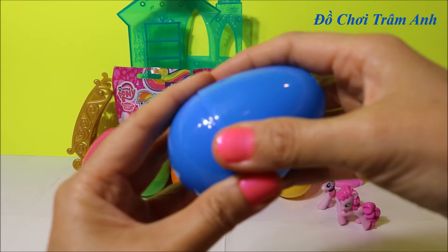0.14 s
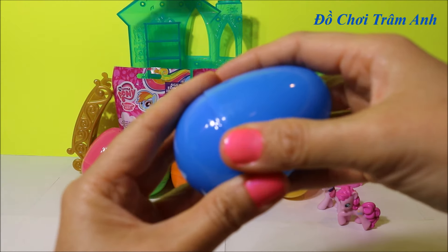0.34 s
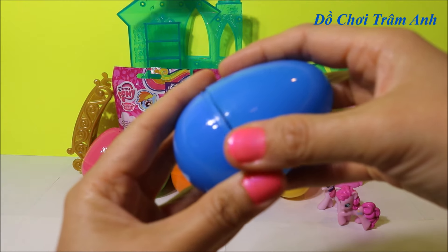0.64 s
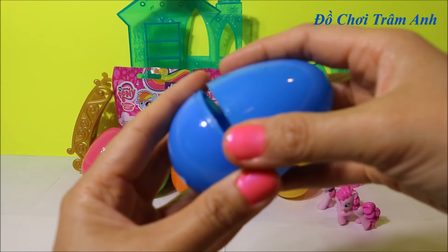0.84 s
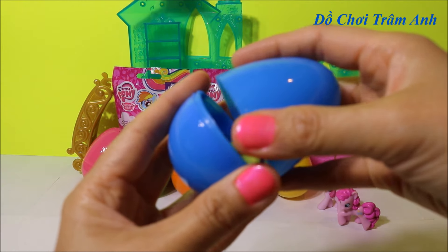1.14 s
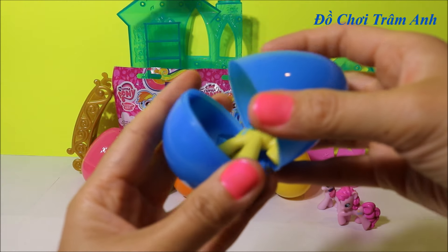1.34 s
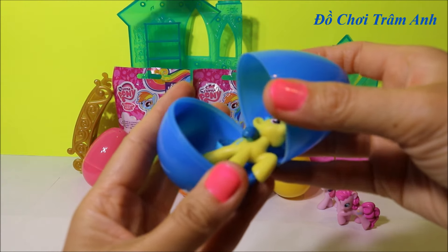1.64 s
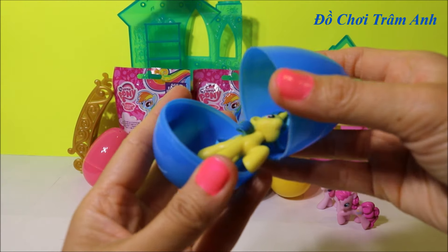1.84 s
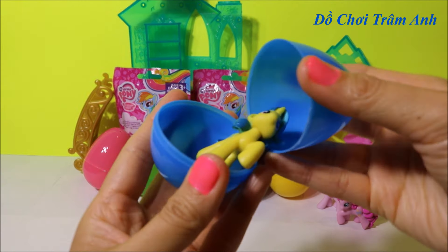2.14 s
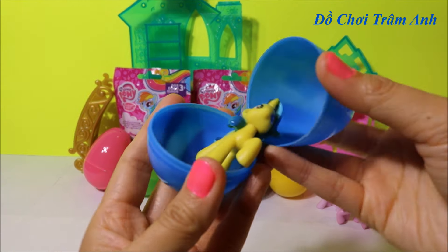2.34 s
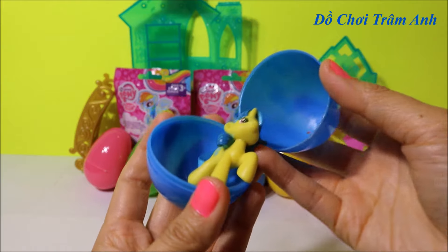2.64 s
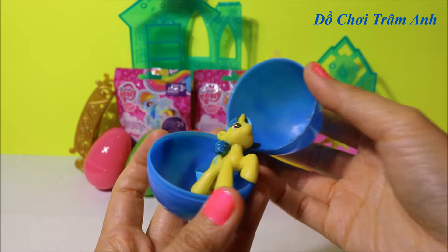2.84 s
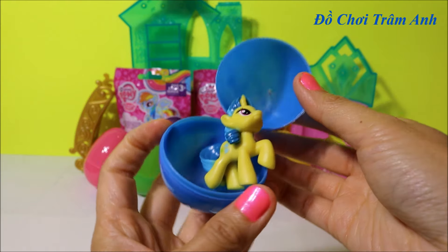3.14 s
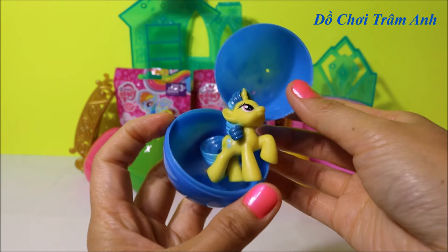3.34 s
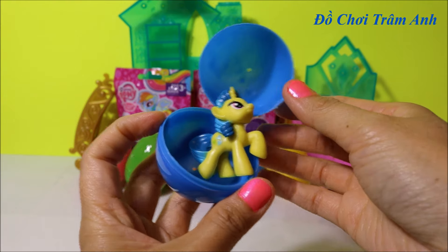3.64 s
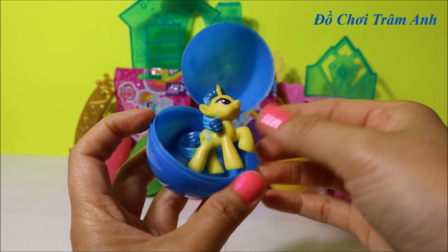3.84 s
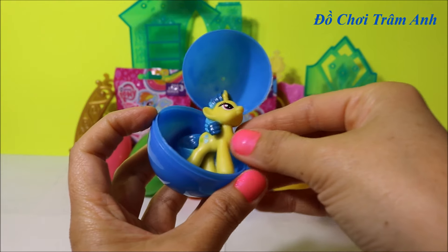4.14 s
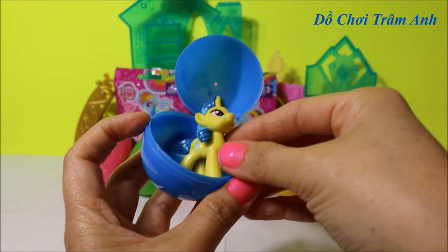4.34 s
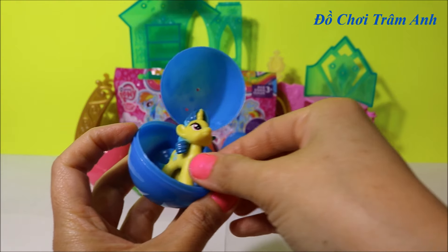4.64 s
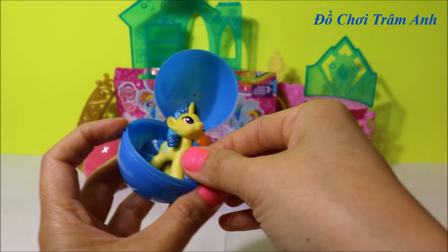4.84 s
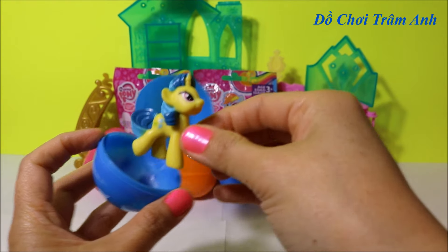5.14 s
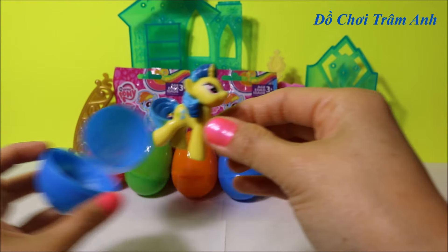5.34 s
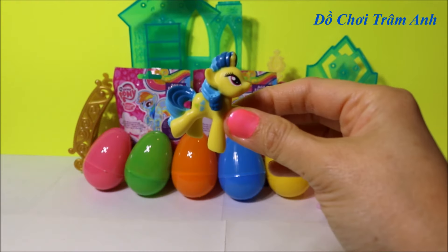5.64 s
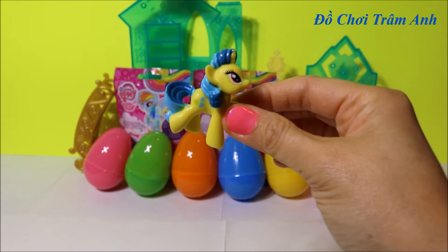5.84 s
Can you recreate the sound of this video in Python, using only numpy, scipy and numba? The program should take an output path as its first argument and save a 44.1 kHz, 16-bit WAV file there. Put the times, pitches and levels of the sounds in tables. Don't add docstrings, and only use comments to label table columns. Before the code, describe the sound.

A quiet small room with soft, wide air hiss and a barely audible steady hum, heard through a very close stereo microphone. Skin rubs a hollow plastic shell, and at 0.06 s the seam snaps with a dry, overloaded pop, by far the loudest sound. Sharp clicks, a squeak and a dull palm bump follow by 0.12 s. Creaky knocks return around 0.38-0.48 s, then lower, hollow knocks at 0.63-0.74 s as the slit opens. From 0.75 s the handling is faint: airy rubs and sparse light taps, with a small flurry around 2.4-2.9 s. A busier cluster at 3.05-3.2 s has crisp, very high fingernail ticks. Near silence follows until about 3.9 s, then occasional taps and rubs, one clearer at 4.29 s, and a stroke near 5.0 s. At 5.88 s the shell clacks firmly onto a table, bounces rapidly, rocks and slides to rest by 5.98 s.

```python
import sys
import numpy as np
from scipy import signal
from scipy.fft import rfft, irfft, next_fast_len
from scipy.io import wavfile
from numba import njit

SR = 44100
rng = np.random.default_rng(int(sys.argv[2]) if len(sys.argv) > 2 else 0)


def volts_from_decibels(level):
    exponent = np.asarray(level, float) / 20
    return 10 ** exponent


def wav_out(sig):
    wavfile.write(sys.argv[1], SR, np.round(np.clip(np.atleast_2d(sig).T, -1, 1) * 32767).astype(np.int16))


N = 263717

# pitch_hz, level_db
HUM_LINES = [(118.4, -76), (360.7, -74), (479.1, -63)]
# pitch_hz, level_db
AIR_COLOUR = [(20, -49), (35, -20), (100, -11), (280, -12.5), (550, -15.5), (1100, -17.5), (1900, -20.5),
              (5000, -25.5), (10000, -29), (16000, -36)]
# pitch_hz, likeness (0 to 1)
AIR_LIKENESS = [(60, 0.42), (300, 0.14), (700, 0.12), (1400, 0.055), (3000, 0.016)]
# peak_s, rise_s per 10 dB, fall_s per 10 dB, cavity_db, skin_above_cavity_db
SQUEEZES = [
    (0.001, 4, 0, -54, 7),
    (.055, 0.3, 0, -65, 9),
    (.114, -0.02, -0.01, -48, 11),
    (.13, -0.1, 0.01, -48.5, 2.5),
    (.39, 0.1, 0.07, -67, 6),
    (.46, -0.03, -0.04, -55, 4),
    (.485, 0.1, 0.04, -58, 0.5),
    (.636, -0.02, 0.07, -55, -16),
    (.664, .015, .06, -48.5, -22),
]
STROKES = [(.726, 0.11, 0.026, -55, -11), (1.29, 0.11, 0.033, -60, -12), (1.36, .09, 0.069, -53.5, -11),
           (1.49, 0.045, 0.11, -55, -3), (1.61, 0.14, .05, -55, -8), (1.91, 0.0093, 0.054, -63, -6),
           (2.112, 0.022, 0.049, -61, -12), (2.508, .13, 0.038, -58.5, -8), (2.63, 0.011, 0.038, -55.5, -7),
           (2.68, .04, .04, -59.5, 0.5), (2.81, 0.046, 0.04, -55.5, 3), (2.852, 0.085, 0.032, -53, -13),
           (2.95, 0.093, 0.045, -62, 5), (3.05, 0.07, 0.068, -53.5, -2), (3.11, 0.033, 0.015, -49, -2.5),
           (3.2, 0.014, 0.087, -61.5, 6), (4.068, 0.033, 0.059, -59.5, -8), (4.252, 0.032, .02, -60.5, -8),
           (4.296, 0.007, 0.032, -58.5, -9), (4.63, 0.052, 0.037, -55, -2.5), (4.768, .02, .015, -65, -6),
           (5.005, .045, 0.03, -53.5, -9), (5.668, 0.016, .03, -61, -11)]
# time_s, pitch_hz
CAVITY_PITCH = [(0, 2200), (.08, 1340), (.55, 1600), (.64, 724), (.76, 1070), (1.28, 1340), (1.6, 1595),
                (2.18, 1660), (2.36, 2270), (2.88, 2140), (2.92, 1730), (3.1, 1860), (3.3, 1650),
                (4.0, 2300), (4.33, 2130), (4.62, 2500), (5.03, 2100), (5.6, 1510)]
# pitch_hz, width_hz, level_db
SKIN_PEAKS = [(3300, 1900, 2.5), (7600, 3000, 0), (11100, 4900, -2)]
# pitch_hz, width_hz, level_db
WALL_PEAKS = [(302, 127, 3), (520, 170, 1.5)]
# pitch_hz, width_hz, level_db
RIM_PEAKS = [(4840, 540, 2), (7620, 280, -10.5)]
# start_s, level_db, bend_db, bend_length_s
POP = [
    (.05983, 2.5, -6, .00065),
]
# pitch_hz, level_db, t60_s, pan_db
POP_MODES = [(1500, -2.5, 0.0035, -1.5), (850, -22, 0.017, -2), (1250, -27, 0.018, 5.5),
             (2600, -11, 0.0049, -6), (2770, -29.5, 0.0086, -20), (2000, -10, 0.0046, -6),
             (5800, -14, 0.0026, -4), (8300, -27.5, 0.0044, -14), (11800, -44, 0.0054, -7)]
# start_s, level_db, cavity_pitch_hz, crack_db
SEAM_KNOCKS = [(.068, -40, 1300, -55), (.073, -27, 1600, -55), (.1173, -24, 3030, -44),
               (.1192, -28, 1500, -33), (.1203, -32, 2600, -30), (.1216, -16, 3480, -39),
               (.1224, -20, 1570, -26), (.3846, -41.5, 1100, -44), (.4445, -33, 500, -58),
               (.4636, -27.5, 610, -55), (.4662, -30, 920, -58), (.4695, -27, 485, -54),
               (.4722, -25, 2810, -47), (.4738, -22.5, 920, -35), (.4765, -23.5, 2730, -40),
               (.478, -27, 1640, -53), (.4798, -27.5, 413, -58), (.6335, -33.5, 610, -68),
               (.638, -38, 513, -64), (.657, -35, 520, -64), (.660, -34, 1430, -62), (.6645, -31, 684, -63),
               (.668, -30.5, 1330, -60), (.6872, -32, 820, -49), (.695, -51, 850, -62)]
SLIT_KNOCKS = [
    (.708, -35, 940, -60),
    (.7135, -38, 933, -64),
    (.734, -45.5, 1130, -71),
    (.741, -56, 1100, -68),
]
TOUCHES = [(.770, -45, 500, -66), (1.1472, -42, 1250, -64), (1.6442, -40, 1500, -62),
           (1.9045, -43.5, 1550, -63), (2.4512, -40.5, 780, -60), (2.5002, -44, 2320, -64),
           (2.5482, -49, 1050, -64), (2.6282, -42, 1500, -49), (2.7702, -51, 2250, -59),
           (3.0672, -57, 1880, -60), (3.1032, -43, 1810, -44), (3.1152, -43, 1500, -60),
           (3.1152, -35, 1790, -61), (3.1192, -42, 1860, -41), (3.1792, -39.5, 3300, -50),
           (3.1872, -42, 774, -42), (3.9402, -43.5, 1680, -62.5), (4.0192, -44, 2370, -60),
           (4.0632, -40, 2300, -60), (4.2902, -32, 1890, -59), (4.5212, -45, 2230, -62),
           (4.6202, -45, 1140, -43), (4.7702, -48, 2100, -63), (4.9632, -43.5, 1140, -66)]
# start_s, level_db, pitch_hz, t60_s
PALM_THUMP = [
    (0.1218, -23.5, 227, 0.037),
]
# start_s, level_db, pitch_hz, pan_db
NAIL_TICKS = [(2.6314, -46, 10600, 0.5), (2.6444, -54, 7540, 0.0), (2.6903, -45, 8060, 8),
              (3.1033, -42, 10800, -2.5), (3.106, -44, 11200, -5), (3.1097, -36, 11200, -4),
              (3.1159, -34, 11200, -2.0), (3.1183, -34.5, 11000, -1.5), (3.172, -36, 11000, -0.5),
              (3.178, -24, 11100, -9), (3.1833, -31, 10900, 7), (3.1939, -41, 9500, -1.5),
              (3.1994, -44, 9860, 1.5), (4.2877, -47, 6650, 2.5), (5.877, -41.5, 8440, 11),
              (5.894, -43, 11000, 9), (5.9114, -43, 8230, 3), (5.9254, -48, 7120, 4)]
# start_s, level_db, pan_db
LANDING = [
    (5.8808, -16.5, 6),
    (5.8881, -31.5, -24),
    (5.906, -31, -10),
    (5.9325, -38, 8),
]
# pitch_hz, level_db, t60_s
TABLE_MODES = [(102.5, -20, 0.12), (197, -15, 0.078), (343, -9, 0.052), (443, -9, 0.03), (560, -11, 0.045),
               (690, -13.5, 0.041), (860, -15, 0.059), (1005, -15, 0.039), (1240, -16, 0.041),
               (1330, 1.5, 0.02), (1470, 3, 0.011), (1580, 3.5, 0.017), (1786, 0, 0.019),
               (1860, -22, 0.022), (2950, -9.5, 0.013), (4100, -22, 0.013)]
# time_s, level_db
ROCKING = [
    (5.882, -80),
    (5.882, -32.5),
    (5.90, -37.5),
    (5.94, -41.5),
    (5.98, -55),
]
# pitch_hz, t60_s
ROOM_T60 = [(150, 0.36), (600, 0.25), (2000, 0.26), (6000, 0.26), (14000, 0.14)]


def at_hz(points, hz):
    table_hz, values = np.transpose(points)
    return np.interp(np.log(hz), np.log(table_hz), values)


def rms_one(x):
    return x / np.sqrt(np.mean(x ** 2) + 1e-20)


def panned(x, pan_db):
    return np.array([volts_from_decibels(pan_db / 2) * x, volts_from_decibels(-pan_db / 2) * x])


def add(out, s, x):
    at = round(s * SR)
    out[:, at:at + x.shape[1]] += x[:, :N - at]


def filtered(x, order, hz, kind):
    return signal.sosfilt(signal.butter(order, hz, kind, fs=SR, output="sos"), x)


def ring(hz, t60, rise_s):
    t = np.arange(int(.15 * SR)) / SR
    decay = volts_from_decibels(-60 * t / max(t60, .001))
    return np.sin(2 * np.pi * hz * t) * decay * (1 - np.exp(-t / rise_s))


def background():
    hz = np.maximum(np.fft.rfftfreq(N, 1 / SR), 10)
    mid, side = rfft(rng.standard_normal((2, N))) * volts_from_decibels(at_hz(AIR_COLOUR, hz))
    alike = np.clip(at_hz(AIR_LIKENESS, hz), 0, 1)
    opposite = np.array([[1], [-1]])
    air = irfft(np.sqrt(1 + alike) * mid + np.sqrt(1 - alike) * side * opposite, N)
    out = volts_from_decibels(-54.5) * rms_one(air)
    t = np.arange(N) / SR
    for line_hz, db in HUM_LINES:
        waver = rms_one(np.interp(t, np.linspace(0, t[-1], 60), rng.standard_normal(60)))
        hum = np.sin(2 * np.pi * line_hz * t + 0.15 * waver)
        out += panned(volts_from_decibels(db + 3.0 + 0.76 * waver) * hum, 0.75)
    return out


def stroke_gains(rows, shape):
    t, power = np.arange(N) / SR, np.zeros((2, N))
    for s, rise_s, fall_s, db, skin_db in rows:
        fade = np.maximum((s - t) / max(rise_s, .002), (t - s) / max(fall_s, .002))
        peak_db = db + np.array([[0], [skin_db]])
        power += volts_from_decibels(2 * (peak_db - 10 * np.minimum(fade ** shape, 8)))
    return np.sqrt(power)


def grains(per_s, spread_db):
    sizes = volts_from_decibels(spread_db * np.minimum(rng.exponential(1, N), 4)) * rng.choice([-1, 1], N)
    return sizes * (rng.random(N) < per_s / SR) + 1e-18


def resonances(x, modes):
    out = 0
    for k, (hz, width_hz, db) in enumerate(modes):
        r = np.exp(-np.pi * width_hz / SR)
        feedback = [1, -2 * r * np.cos(2 * np.pi * hz / SR), r * r]
        out = out + (-1) ** k * volts_from_decibels(db) * signal.lfilter([1 - r * r, 0, r * r - 1], feedback, x)
    return rms_one(out)


@njit
def cavity(x, hz, r):
    y = np.zeros(len(x))
    for i in range(2, len(x)):
        push = np.sqrt(1 - r[i]) * (x[i] - x[i - 2])
        y[i] = push + 2 * r[i] * np.cos(2 * np.pi * hz[i]) * y[i - 1] - r[i] * r[i] * y[i - 2]
    return y


def rubbing():
    hz = np.interp(np.arange(N) / SR, *np.transpose(CAVITY_PITCH))
    hard, hard_skin = stroke_gains(SQUEEZES, 1.05)
    light, light_skin = stroke_gains(STROKES, 1.4)
    wall = hard + volts_from_decibels(-11) * light
    coarse = grains(2500, spread_db=4.0)
    fine, other = grains(6000, spread_db=4.5), grains(6000, spread_db=7.0)
    opened = np.clip((hz - 1900) / 300, 0, 1)
    width_hz = 150 + 450 * opened
    narrow = rms_one(cavity(coarse, hz / SR, np.exp(-np.pi * width_hz / SR)))
    broad = resonances(fine, [(1100, 840, -1.5), (2500, 1800, -3.5)])
    hollow = 0.89 * narrow + (0.58 + 0.37 * opened) * broad
    low = (hard + light) * hollow + wall * resonances(coarse, WALL_PEAKS)
    hiss = np.array([resonances(fine + 0.5 * other, SKIN_PEAKS), resonances(fine - .55 * other, SKIN_PEAKS)])
    rim = (0.2 + 0.72 * opened) * resonances(fine, RIM_PEAKS)
    return panned(low, -.3) + (hard_skin + light_skin) * (0.92 * hiss + rim)


def pop():
    (s, pop_db, bend_db, bend_s), = POP
    out = np.zeros((2, N))
    t = np.arange(int(bend_s * SR)) / (bend_s * SR)
    bend = -volts_from_decibels(bend_db) * np.sin(np.pi * t ** 3.3) ** 0.59
    add(out, s - bend_s, panned(bend, .1))
    for hz, db, t60, pan_db in POP_MODES:
        add(out, s, panned(volts_from_decibels(pop_db + db + 2) * ring(hz, t60, 4e-5), pan_db))
    return out


def taps():
    laws = [(SEAM_KNOCKS, (.011, .45)), (SLIT_KNOCKS, (0.045, .9)), (TOUCHES, (0.016, 0.092))]
    rows = [row + law for table, law in laws for row in table]
    out, luck = np.zeros((2, N)), rng.uniform(-1.09, 1, (len(rows), 3))
    for (s, db, hz, crack_db, ring_s, fall), (a, b, c) in zip(rows, luck):
        t60 = ring_s * (hz / 1000) ** -fall
        pan_db = -3 * np.log2(hz / 800)
        body = ring(hz, t60, 0.00008)
        body += volts_from_decibels(-13.0 + 7.5 * a) * ring(hz * (1.54 + 0.25 * b), min(0.78 * t60, .008), 1e-4)
        body -= volts_from_decibels(-2.5 + 6.6 * c) * ring(hz * (0.606 + 0.25 * a), min(t60, .01), 0.00016)
        body += volts_from_decibels(2.0) * ring(2160, 0.0013, 5e-5)
        crack = ring(5200 + 900 * c, 0.003, 6e-5) + 0.43 * ring(7800 + 900 * a, 0.0016, 6e-5)
        tap = volts_from_decibels(db - 2.0) * np.sign(b) * body + volts_from_decibels(crack_db + 6.5) * crack
        add(out, s, panned(tap, pan_db))
    out = filtered(out + 1e-18, 2, 260, "high")
    for s, db, hz, t60 in PALM_THUMP:
        add(out, s, panned(-volts_from_decibels(db) * ring(hz, t60, 0.0014), .1))
    return out


def ticks():
    out, buzz = np.zeros((2, N)), rng.standard_normal((len(NAIL_TICKS), 300))
    buzz_decay = volts_from_decibels(-60 * np.arange(300) / SR / 0.015)
    for (s, db, hz, pan_db), noise in zip(NAIL_TICKS, buzz):
        tick = ring(hz, 0.0011, 6e-5)[:300] + volts_from_decibels(-11.5) * np.diff(noise, prepend=0) * buzz_decay
        add(out, s + .0009, panned(volts_from_decibels(db + 4) * tick, pan_db))
    return filtered(out + 1e-18, 4, [4500, 14000], "band")


def landing():
    out, luck = np.zeros((2, N)), rng.normal(0, 2.3, (len(LANDING), len(TABLE_MODES)))
    modes = []
    for k, (hz, db, t60) in enumerate(TABLE_MODES):
        rise_s = 6e-4 if hz < 2500 else 6.5e-4
        modes.append(volts_from_decibels(db) * (-1) ** min(k, 8) * ring(hz, t60, rise_s))
    modes = np.array(modes)
    for (s, db, pan_db), spread_db in zip(LANDING, luck):
        add(out, s, panned(volts_from_decibels(db - 5.0) * volts_from_decibels(spread_db) @ modes, pan_db))
    s, db = np.transpose(ROCKING)
    rock_ring = volts_from_decibels([6] * 8 + [0] * 8) @ modes
    chatter = signal.fftconvolve(grains(2500, spread_db=2.5), rock_ring)[:N]
    chatter = rms_one(filtered(chatter, 6, 2100, "low"))
    rocking_db = np.interp(np.arange(N) / SR, s, db, left=-120)
    out += panned(volts_from_decibels(rocking_db) * chatter, .1)
    return filtered(out + 1e-18, 2, 75, "high")


def room(x):
    t, size = np.arange(int(.4 * SR)) / SR, next_fast_len(N + SR)
    echo, white = 0, rng.standard_normal((2, len(t)))
    for hz in 125 * 2. ** np.arange(7):
        band = filtered(white, 2, [hz / 2 ** .5, hz * 2 ** .5], "band")
        echo = echo + band * volts_from_decibels(-60 * t / at_hz(ROOM_T60, hz))
    echo = echo * (1 - np.exp(-(t / 0.0015) ** 2))
    echo = echo / np.sqrt(np.sum(echo ** 2) / 2)
    return irfft(rfft(x.mean(axis=0), size) * rfft(echo, size), size)[:, :N]


def scene():
    quiet_room = background()
    near = rubbing() + pop() + taps() + ticks() + landing()
    return quiet_room + near + volts_from_decibels(-14.5) * room(near)


def band_limit(x):
    return signal.sosfilt(signal.butter(12, 16470, fs=SR, output="sos"), x)


def record(dry):
    clipped = np.clip(dry, -1, 1)
    low_pass = signal.butter(12, 15900, fs=SR, output="sos")
    return band_limit(signal.sosfiltfilt(low_pass, clipped))


dry = scene()
out = record(dry)
wav_out(out)
```